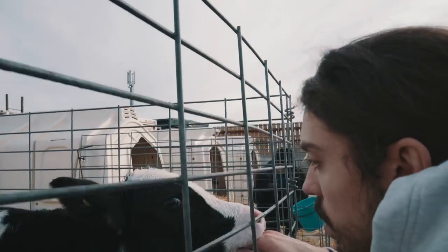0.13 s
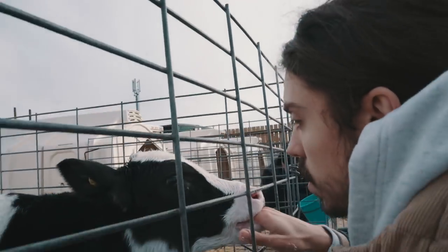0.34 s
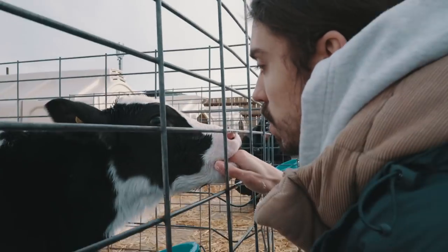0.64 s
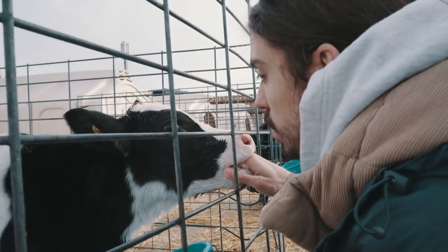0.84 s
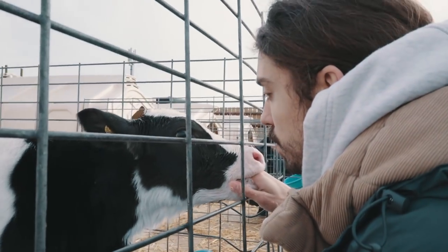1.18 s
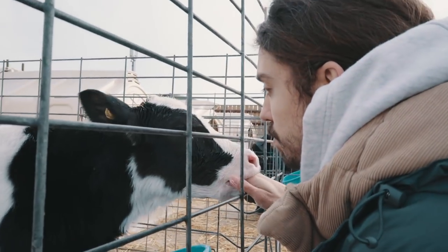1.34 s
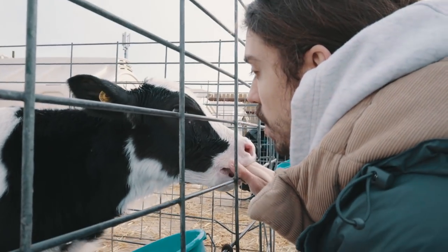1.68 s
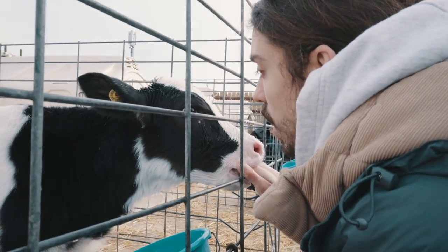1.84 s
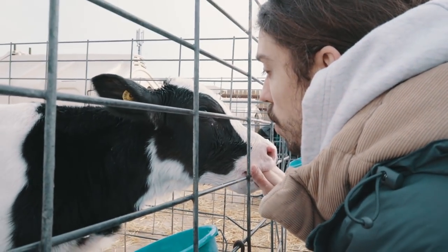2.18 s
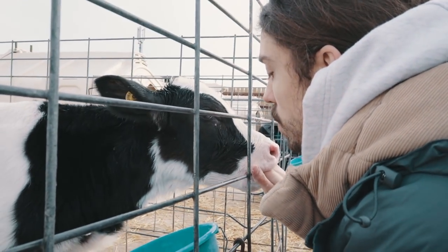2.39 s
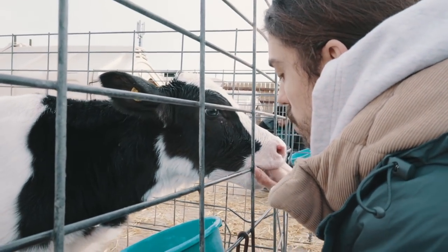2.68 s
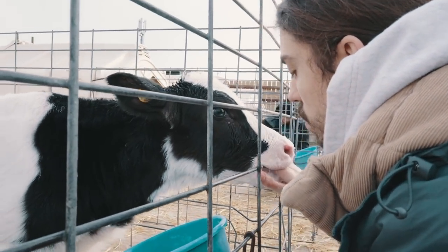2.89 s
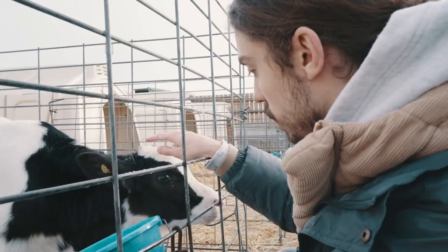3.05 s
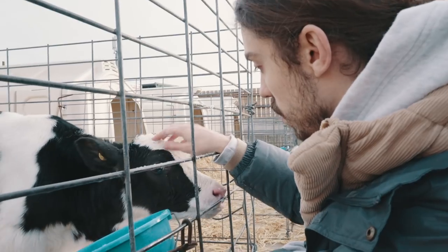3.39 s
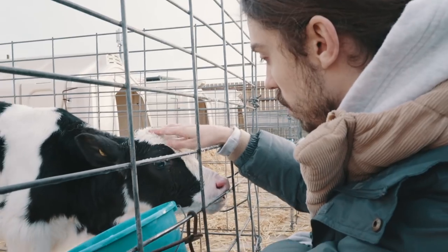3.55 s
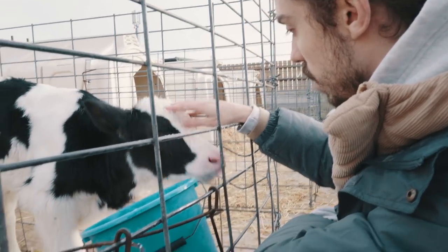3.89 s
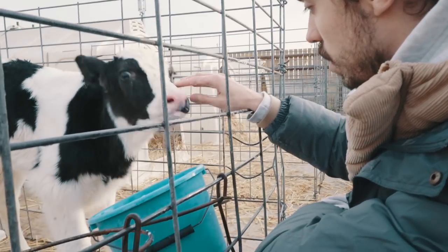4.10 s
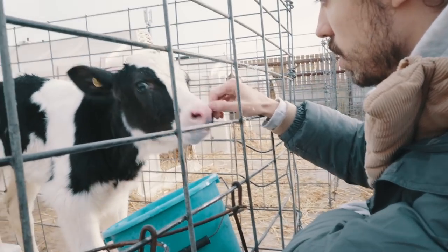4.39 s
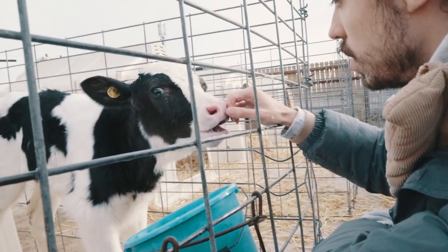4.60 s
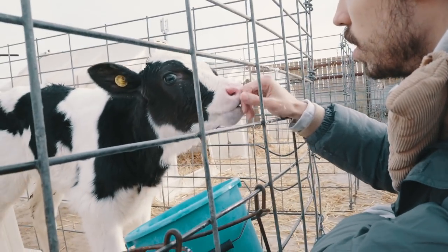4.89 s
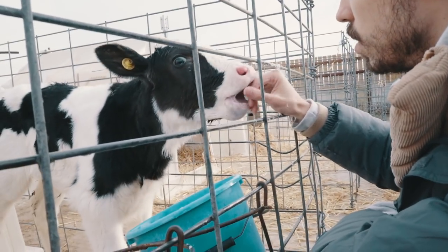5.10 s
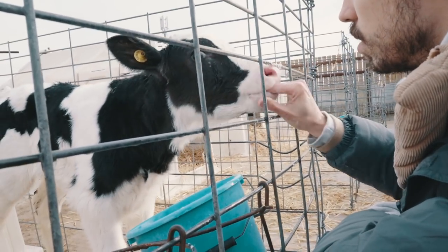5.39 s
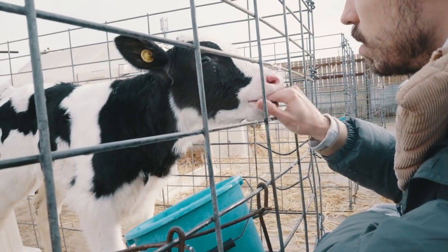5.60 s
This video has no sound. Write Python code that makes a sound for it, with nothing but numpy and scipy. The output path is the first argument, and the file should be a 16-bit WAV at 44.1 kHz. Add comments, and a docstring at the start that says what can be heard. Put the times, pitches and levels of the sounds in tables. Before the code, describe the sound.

Wet licking clicks, then a calf moos once close by, over wind on the microphone and a distant engine drone.

```python
"""A farmyard, with the microphone close to a calf's pen. The calf's tongue and lips click wetly, then
it moos once. Pulses of its vocal folds ring the throat: the call starts as a creak, hums through the nose,
then the mouth opens and the pitch sags. Far off, machinery murmurs and an engine drones. Close by,
a sleeve rustles, the pen is bumped and wind buffets the microphone, which crackles in the first gust.
The recorder whines faintly, and its limiter ducks the yard under the call."""
import sys
import numpy as np
from scipy import signal
from scipy.fft import rfft, irfft
from scipy.io import wavfile
from scipy.ndimage import uniform_filter1d, minimum_filter1d

SR = 44100
rng = np.random.default_rng(int(sys.argv[2]) if len(sys.argv) > 2 else 0)


def to_wav(s):
    """Save 16-bit WAV."""
    ch = np.atleast_2d(s).T  # columns
    pcm = np.round(np.clip(ch, -1, 1) * 32767)  # PCM
    wavfile.write(sys.argv[1], SR, pcm.astype(np.int16))


N = 253134
TIME = np.arange(N) / SR


def undb(db):
    """Decibels to gain."""
    return 10 ** (np.asarray(db) / 20)


def unit(x):
    """Scale to rms 1."""
    return x / np.sqrt(np.mean(x ** 2))


def noise():
    """White noise."""
    return rng.standard_normal(N)


def walk(rate, size=16384):
    """A random wander of rms 1 that turns `rate` times a second."""
    return unit(np.interp(TIME * rate, np.arange(size), rng.standard_normal(size)))


def curve(rows, column=1):
    """One column of a table, joined by straight lines in time."""
    rows = np.array(rows)
    return np.interp(TIME, rows[:, 0], rows[:, column])


def bell(middle, half_width):
    """A smooth swell around one moment."""
    return np.exp(-((TIME - middle) / half_width) ** 2)


def bursts(times, db, decay):
    """Envelope that jumps at each time and dies away."""
    return sum(undb(d) * (TIME >= t) * np.exp(-np.abs(TIME - t) / decay) for t, d in zip(times, db))


def causal(gain):
    """The quickest-ringing complex spectrum that has this gain."""
    cepstrum = irfft(np.log(gain))
    half = len(cepstrum) // 2
    cepstrum[1:half] *= 2
    cepstrum[half + 1:] = 0
    return np.exp(rfft(cepstrum))


def colour(x, points, size=8192):
    """Causal filter with the given (Hz, dB) outline and unit energy."""
    hz, db = np.transpose(points)
    outline_db = np.interp(np.log(np.fft.rfftfreq(size, 1 / SR) + 1), np.log(hz), db)
    response = irfft(causal(undb(outline_db)))
    return signal.fftconvolve(x, response / np.linalg.norm(response))[:N]


def ring(x, hz, width):
    """One resonance, gain 1 at its centre."""
    return signal.lfilter(*signal.iirpeak(hz, hz / width, fs=SR), x)


def narrow_noise(hz, width):
    """Noise of rms 1 gathered around one pitch."""
    return unit(ring(ring(noise(), hz, width), hz, width))


def band(x, lo, hi, order=3):
    """Band-pass between two edges in Hz."""
    return signal.sosfilt(signal.butter(order, [lo, hi], "band", fs=SR, output="sos"), x)


def lows(x, hz):
    """Low-pass without delay."""
    return signal.sosfiltfilt(signal.butter(2, hz, fs=SR, output="sos"), x)


# The wash from across the yard. Each row: frequency in Hz, relative level in dB.
YARD_SPECTRUM = [(30, -18.5), (70, -4.5), (150, -12.5), (366, -16.5), (470, -23), (735, -26.5),
                 (1010, -32.5), (1450, -34.5), (2700, -43.5), (3400, -40.5), (5400, -56.5), (9200, -67.5),
                 (10200, -77.5), (15500, -73.5)]
# Its slow swell. Each row: time in seconds, relative levels of murmur and of hiss in dB.
YARD_SWELL = [(0, -31.5, -42.5), (.7, -28, -44.5), (1.1, -29, -42.5), (2.3, -27, -43.5),
              (3.2, -25.5, -39.5), (3.95, -27.5, -39), (4.9, -27.5, -43.5), (5.74, -31, -42)]


def yard(murmur_trim_db=-1, flicker_db=1.82, split_hz=1600):
    """Distant farm machinery: a low murmur and a hiss, each flickering on its own."""
    wash = colour(noise(), YARD_SPECTRUM)
    low = lows(wash, split_hz)
    murmur = low / np.std(band(wash, 200, 1200))
    hiss = (wash - low) / np.std(band(wash, 2000, 5000))
    murmur_db = curve(YARD_SWELL) + murmur_trim_db + flicker_db * walk(18)
    hiss_db = curve(YARD_SWELL, column=2) + .5 * walk(32)
    return murmur * undb(murmur_db) + hiss * undb(hiss_db)


# Wind rumble on the microphone. Each row: frequency in Hz, relative level in dB.
WIND_SPECTRUM = [(6, -11), (14, 0.5), (30, 3), (45, -12.5), (70, -31.5), (140, -29.5), (400, -84.5)]
# Gusts on top of the breeze. Each row: middle in seconds, half-width in seconds, level in dB.
GUSTS = [(0.445, 0.29, -2), (1.2, 0.47, -20), (2.8, 0.34, -23), (3.8, 0.48, -17)]


def wind(breeze_db=-25):
    """A steady breeze and a few gusts push on the microphone."""
    gusts = sum(undb(db) * bell(t, half_width) for t, half_width, db in GUSTS)
    return unit(colour(noise(), WIND_SPECTRUM)) * (undb(breeze_db) + gusts)


# A sleeve brushes the jacket. Each row: middle in seconds, half-width in seconds, level in dB.
RUSTLES = [(0.017, 0.024, -41), (0.17, 0.044, -49), (0.318, 0.015, -43), (0.4, .012, -50)]


def sleeve(lo_hz=3500, hi_hz=9000, grain_db=3):
    """Cloth slides over cloth in short, grainy strokes."""
    fibres = unit(band(noise() * undb(grain_db * walk(400)), lo_hz, hi_hz, order=2))
    return fibres * sum(undb(db) * bell(t, half_width) for t, half_width, db in RUSTLES)


# Pops at the microphone in the first gust. Each row: time in seconds, relative level in dB,
# extra gain of the deepest resonance in dB.
CRACKLES = [(0.221, -36.5, -13), (0.323, -31, -1), (0.4018, -19, -3.5), (0.41, -26.5, -1),
            (0.51, -33.5, -8), (0.606, -25.5, -7)]
# The resonances that colour each pop, deepest first. Each row: centre in Hz, width in Hz, gain in dB.
CRACKLE_MODES = [(790, 146, 21), (2120, 880, 13.5), (2390, 580, -3), (3230, 380, -19)]


def wind_crackle(gain_db=11, decay_s=0.0015, skirt_db=-17, skirt_s=0.0024):
    """A few short, sharp pops as the first gust overloads the microphone."""
    hiss, crackle = noise(), 0
    for t, db, deep_db in CRACKLES:
        skirt = undb(db + skirt_db) * np.exp(-np.abs(TIME - t) / skirt_s)  # faint hiss around the pop
        pop = hiss * (bursts([t], [db], decay_s) + skirt + 1e-18)
        for k, (hz, width, mode_db) in enumerate(CRACKLE_MODES):
            crackle += undb(mode_db + deep_db * (k == 0)) * ring(pop, hz, width)
    return undb(gain_db) * band(crackle, 400, 3700, order=4)


def pen_bounce(x, bounce_db=-15, delay_s=.0029, edge_hz=2000):
    """The bucket and bars beside the muzzle throw the treble straight back to the microphone."""
    return undb(bounce_db) * np.interp(TIME - delay_s, TIME, band(x, edge_hz, 13000, order=1))


def hutch_echo(x, echo_db=-27, t60=0.26, top_hz=3000):
    """The hutches around the pen scatter a short dull echo."""
    tail = band(noise(), 290, top_hz, order=2) * np.exp(-np.log(1000) * TIME / t60) * (TIME > .008)
    return undb(echo_db) * signal.fftconvolve(x, tail / np.linalg.norm(tail))[:N]


# Bumps against the pen. Each row: middle in seconds, half-width in seconds, pitch in Hz, level in dB.
BUMPS = [(0.71, 0.04, 122, -21), (3.675, 0.08, 145, -19)]


def bumps(width_hz=60):
    """Soft contact with the pen makes dull, low swells."""
    return sum(narrow_noise(hz, width_hz) * undb(db) * bell(t, half) for t, half, hz, db in BUMPS)


# Tongue and lips, close up. Each row: start in seconds, relative level in dB,
# extra gain of the saliva's treble in dB, decay of the body in seconds.
LICKS = [(0.767, -26, -12, 0.012), (1.147, -25.5, -11.5, 0.0079), (1.274, -28, -11, 0.0055),
         (1.401, -25, -12, 0.0058), (1.524, -24, -11, 0.017), (1.74, -13.5, -17.5, 0.0076),
         (2.002, -28, -13, .005), (2.282, -38, 4.5, .004), (2.488, -26.5, -17.5, .005),
         (2.671, -14.5, -21, 0.0033), (2.739, -19, -19, 0.019), (2.869, -38, -1.5, .005),
         (3.603, -21.5, -23, .005)]
# The body of a click. Each row: frequency in Hz, relative level in dB.
LICK_SPECTRUM = [(290, -43.5), (500, -21), (760, -2.5), (1330, -14.5), (1740, -11.5), (2640, -14),
                 (3100, -11), (3900, -13), (4440, -19.5), (5420, -21.5), (7050, -35), (11900, -120)]


def licking(body_db=-5, spit_db=-6, spit_decay_s=0.015, grain_db=4):
    """Each wet click has a body and a fine crackle of saliva."""
    times, db, treble_db, _ = np.transpose(LICKS)
    clicks = sum(bursts([t], [level], decay) for t, level, _, decay in LICKS)
    body = colour(noise() * clicks, LICK_SPECTRUM)
    crackle = noise() * undb(grain_db * walk(820))
    spit = unit(band(crackle, 5900, 7500, order=1)) * bursts(times, db + treble_db, spit_decay_s)
    return undb(body_db) * body + undb(spit_db) * band(spit, 4100, 20000)


# The far engine's upper tones. Each row: centre in Hz, width in Hz, relative level in dB.
ENGINE_TONES = [(218.1, 19, -15.5), (357.8, 12, -23.5), (404.1, 15, -19)]
# Its hum dips briefly. Each row: middle in seconds, half-width in seconds, depth in dB.
ENGINE_DIPS = [(1.405, 0.031, 21), (2.383, 0.037, 20), (5.31, 0.061, 3)]


def engine(hz=100, waver=0.0346, flutter_db=3, gain_db=-18.5, up_s=1.066, peak_s=3.14):
    """A far engine, wavering on its way through the air; it comes up, peaks mid-way and sinks a little."""
    cycles = np.cumsum(hz * (1 + waver * walk(25))) / SR
    firing = np.sqrt(2) * np.sin(2 * np.pi * cycles) * undb(flutter_db * walk(20))
    upper = sum(undb(db) * narrow_noise(centre, width) for centre, width, db in ENGINE_TONES)
    fade_db = 68 * np.maximum(up_s - TIME, 0) + 2 * np.abs(TIME - peak_s)  # slopes in dB a second
    dips_db = sum(depth * bell(t, half_width) for t, half_width, depth in ENGINE_DIPS)
    return (firing + upper) * undb(gain_db - fade_db - dips_db)


# The call's stages begin: a soft fry, a harsh creak, the clear tone, the folds letting go.
FRY_S, CREAK_S, CLEAR_S, STOP_S = 4.005, 4.066, 4.185, 4.866


def stages(fry, creak, clear):
    """One value for each stage of the call."""
    return np.select([TIME < CREAK_S, TIME < CLEAR_S], [fry, creak], clear)


def effort(push_s=4.641, push_db=31.5, rise_s=0.29, fall_s=0.17, release_db_per_s=700):
    """Drive of the voice in dB: it swells with one push of the belly and collapses as the folds let go."""
    push = bell(push_s, np.where(TIME < push_s, rise_s, fall_s))
    release_db = release_db_per_s * np.maximum(TIME - STOP_S, 0)
    return stages(fry=-8.5, creak=7.5, clear=0) + push_db * push - release_db


# The clear part of the call. Each row: time in seconds, pitch in Hz.
CALL_PITCH = [(4.2, 120), (4.272, 127), (4.39, 135.1), (4.554, 137.7), (4.76, 130.3), (4.812, 122),
              (4.86, 100.7), (4.87, 101.3)]
# How unevenly the folds beat. Each row: time in seconds, roughness from 0 to 1.
CALL_ROUGHNESS = [(4.05, .3), (4.07, 1), (4.175, 1), (4.2, .08), (4.26, .02), (4.435, .01), (4.448, .12),
                  (4.462, .005), (4.76, .01), (4.835, .08), (4.87, .45)]


def glottis(fry_hz=88.8, creak_hz=154.9, jitter=0.095, shimmer_db=2, weak_db=-7.5, release_s=.05):
    """Time, strength, roughness and period of each closure of the vocal folds."""
    hz = stages(fry_hz, creak_hz, curve(CALL_PITCH))
    cycles = np.cumsum(hz * (TIME > FRY_S) * (TIME < STOP_S + release_s)) / SR
    count = np.arange(1, int(cycles[-1]))
    times = np.interp(count, cycles, TIME)
    slip, swell = rng.standard_normal((256, 2))[:len(times)].T
    rough = np.interp(times, *np.transpose(CALL_ROUGHNESS))
    period = 1 / np.interp(times, TIME, hz)
    weak = (count % 3 != 1) * (times < CLEAR_S)  # until the tone clears, only every third is strong
    db = np.interp(times, TIME, effort()) + rough * (shimmer_db * swell + weak_db * weak)
    return times + jitter * rough * period * slip, undb(db) * np.sqrt(period * SR), rough, period


def fold_touch(t, period, hz, db=-8, fade_db_per_s=6, lead_cycles=0.2167, drift_cycles_per_s=0.061):
    """Spectrum of a lighter touch before the folds shut; it fades and nears the closure as they go on."""
    held_s = max(t - CLEAR_S, 0)
    lead_s = (lead_cycles - drift_cycles_per_s * held_s) * period
    return undb(db - fade_db_per_s * held_s) * np.exp(2j * np.pi * hz * lead_s)


# Throat and nose resonances in six postures, in matching order so that each can glide.
# Each row: centre in Hz, width in Hz, relative level in dB.
TIGHT = [(130, 120, -2), (550, 450, -4), (1170, 500, -5), (1680, 500, -4), (2100, 250, -13),
         (2850, 300, -22), (3900, 600, -9), (5250, 600, -23), (7600, 2500, -40)]
HUM = [(122, 290, 12), (496, 500, 1), (1130, 660, 0), (1710, 240, 5), (2300, 1300, -8.5),
       (3100, 600, -13.5), (3580, 810, -4.5), (5300, 1600, -25), (7440, 4100, -34.5)]
NASAL = [(135, 65, -3.5), (460, 330, -0.5), (1330, 640, -5), (1720, 240, -3), (2020, 410, -6),
         (2805, 116, -7.5), (3510, 420, -6.5), (4870, 350, -28), (7600, 3200, -48.5)]
PARTED = [(137, 200, -25), (416, 115, 4), (1290, 340, -1.5), (1598, 204, 3), (2230, 144, 0.5),
          (2770, 460, -13), (3620, 1150, -21), (4740, 440, -27), (7600, 2100, -55.5)]
OPEN = [(133, 110, -31), (517, 192, 2.5), (1426, 75, 0.5), (1544, 710, -3), (2376, 215, -1.5),
        (2933, 120, -6.5), (3370, 950, -12.5), (5030, 1300, -29), (7600, 2400, -46.5)]
CLOSING = [(105, 420, -10), (428, 490, 1), (1180, 640, -3), (1510, 220, 4), (2430, 320, -7),
           (2780, 170, -5.5), (3480, 710, -14.5), (5000, 1100, -32), (7600, 2700, -48)]


def throat(posture, hz, leak_db=-27, leak_hz=2600):
    """Gain of the airway; between two postures every resonance glides."""
    shapes = np.array([TIGHT, HUM, NASAL, PARTED, OPEN, CLOSING])
    shares = np.maximum(1 - np.abs(posture - np.arange(len(shapes))), 0)
    modes = np.tensordot(shares, shapes, 1)
    power = sum((undb(db) / (1 + (2 * (hz - centre) / width) ** 2)) ** 2 for centre, width, db in modes)
    walls = undb(leak_db) / (1 + (hz / leak_hz) ** 4)  # a dull share fills the valleys
    return unit(np.sqrt(power + walls ** 2))


# The mouth through the call, close to the microphone. Each row: time in seconds,
# posture (0 tight, 1 hum, 2 nasal, 3 lips parted, 4 open, 5 closing).
POSTURES = [(4.17, 0), (4.24, 1), (4.36, 2), (4.438, 2), (4.458, 3), (4.55, 3), (4.68, 4), (4.79, 4.2),
            (4.86, 5)]


def moo(gain_db=-13, lead_hz=650, edge_hz=2800, soft_hz=450, size=2048,
        air_db=-30, air_hz=2400, rasp_db=-3, puff_s=.003):
    """Every closure of the folds, with its puff of air, rings the throat as it is shaped just then."""
    hz, age = np.fft.rfftfreq(size, 1 / SR), np.arange(size) / SR
    ahead = size // 8
    # the flow swells before it is cut and the folds close like a zip, so the lows come first
    swell = np.exp(4j * (np.arctan(hz / lead_hz) + 2 * np.arctan(hz / edge_hz)))
    puffs = rng.standard_normal((256, size)) * np.exp(-age / puff_s)
    breathiness = np.minimum(undb(air_db) * (1 + (hz / air_hz) ** 2), 1)  # air gains in the treble
    voice = np.zeros(N)
    for t, strength, rough, period, puff in zip(*glottis(), puffs):
        start, fraction = int(t * SR) - ahead, t * SR % 1
        air = rfft(puff / np.linalg.norm(puff)) * (breathiness + rough * undb(rasp_db))
        source = 1 + air + fold_touch(t, period, hz)
        source /= 1 + (hz / (soft_hz * strength)) ** 2  # a weak closure is a dull one
        delay = np.exp(-2j * np.pi * hz * (ahead + fraction) / SR)
        airway = causal(throat(np.interp(t, *np.transpose(POSTURES)), hz))
        voice[start:start + size] += strength * irfft(source * swell * airway * delay)
    return undb(gain_db) * voice


def scene():
    """One microphone at the pen: the calf close up, the farm far behind."""
    close = moo() + wind_crackle() + licking()
    farm = yard() + engine()
    return (close + pen_bounce(close) + hutch_echo(close) + farm + wind() + bumps() + sleeve())[None]


def whine(hz=15000, db=-68, peak_s=2, half_width_s=1):
    """A thin electronic whine swells and fades."""
    return np.sqrt(2) * np.sin(2 * np.pi * hz * TIME) * undb(db) * bell(peak_s, half_width_s)


def limiter(x, ceiling=0.89, release_db_per_s=170, bass_db=0.5, bass_hz=50, size=129):
    """The gain drops just ahead of each peak, most readily for deep bass, and recovers steadily."""
    sensed = x + undb(bass_db) * lows(x, bass_hz)
    over_db = 20 * np.log10(np.maximum(np.abs(sensed) / ceiling, 1))
    recovery = release_db_per_s * TIME
    cut_db = np.maximum.accumulate(over_db + recovery) - recovery
    return x * undb(uniform_filter1d(minimum_filter1d(-cut_db, size), size))


def record(dry, notch_hz=6100, notch_width_hz=450, top_hz=15800):
    """The microphone port cuts a notch; the recorder limits, whines, clips and cuts the top."""
    port = dry[0] - ring(dry[0], notch_hz, notch_width_hz)
    limited = np.clip(limiter(port) + whine(), -1, 1)
    return signal.sosfilt(signal.ellip(8, .2, 70, top_hz, fs=SR, output="sos"), limited)[None]


dry = scene()
out = record(dry)
to_wav(out)
```